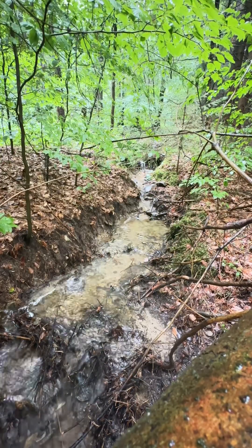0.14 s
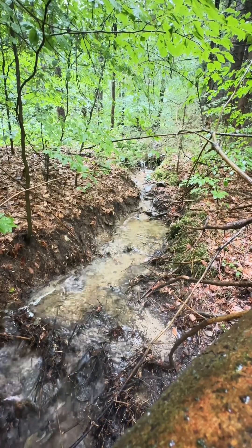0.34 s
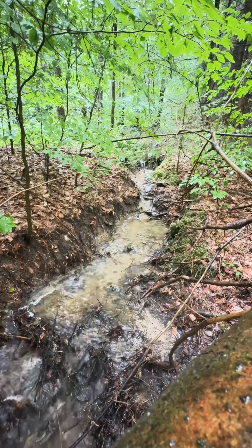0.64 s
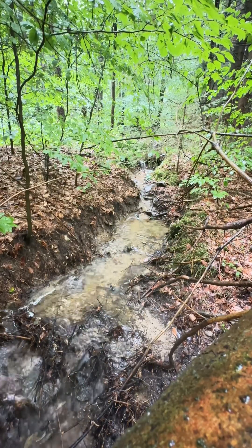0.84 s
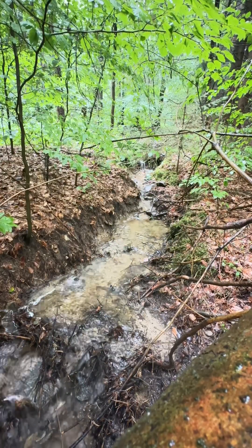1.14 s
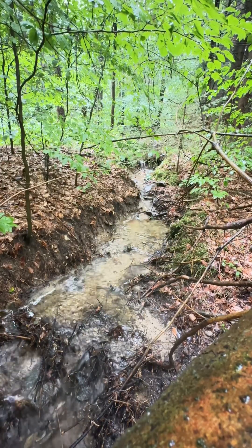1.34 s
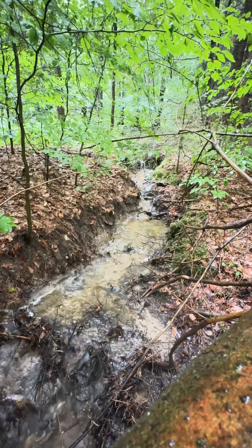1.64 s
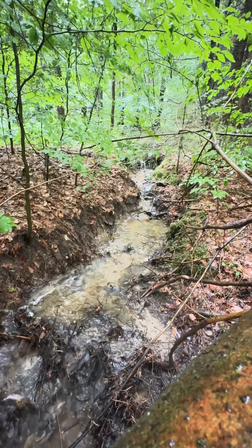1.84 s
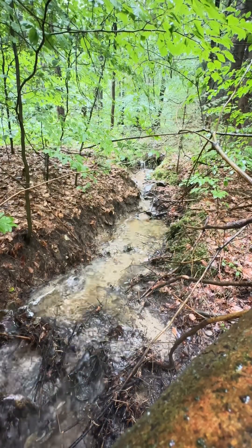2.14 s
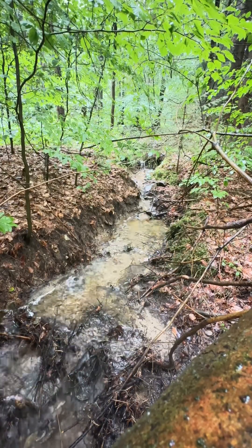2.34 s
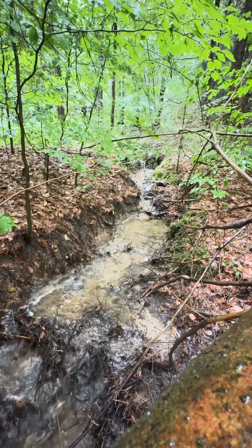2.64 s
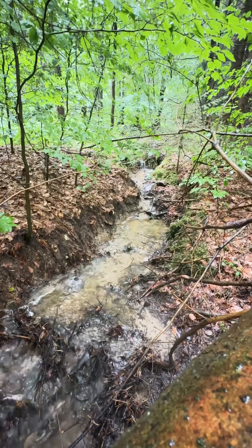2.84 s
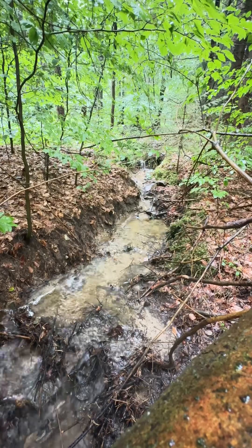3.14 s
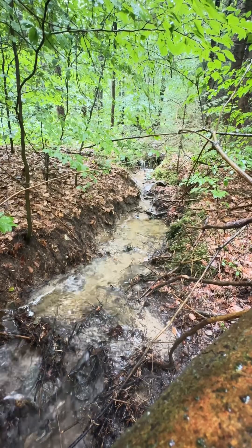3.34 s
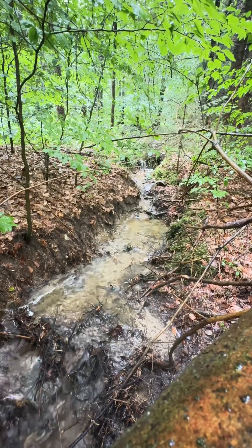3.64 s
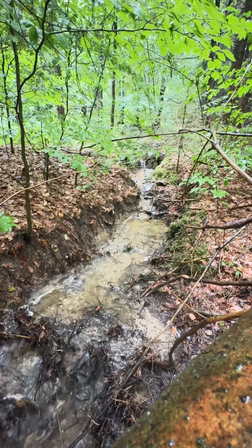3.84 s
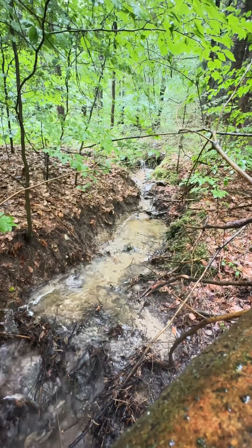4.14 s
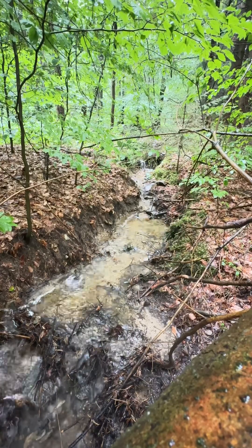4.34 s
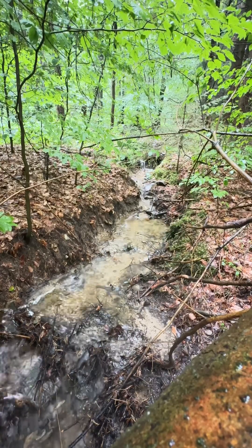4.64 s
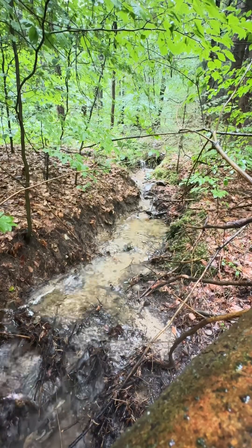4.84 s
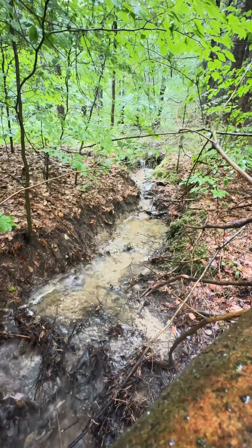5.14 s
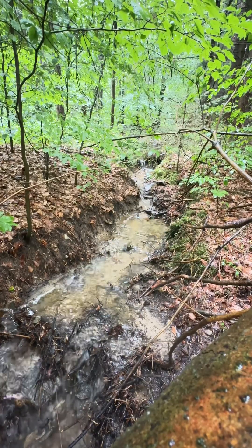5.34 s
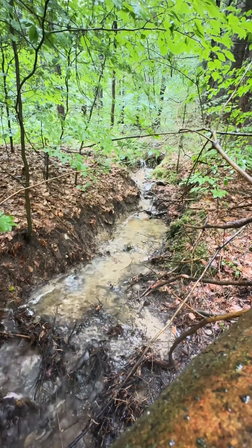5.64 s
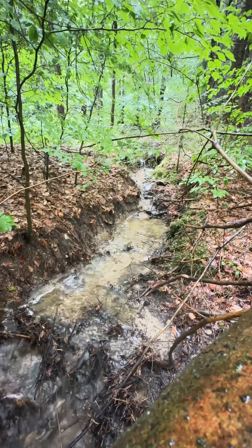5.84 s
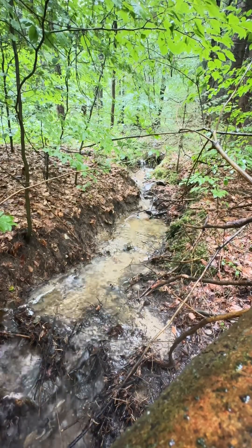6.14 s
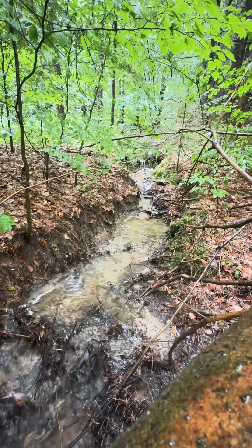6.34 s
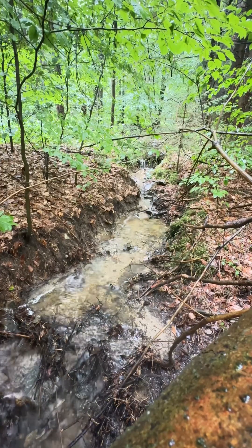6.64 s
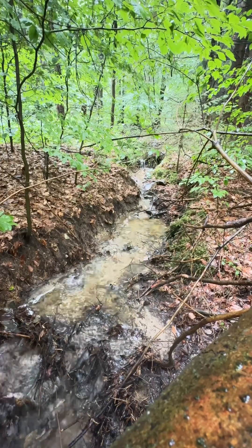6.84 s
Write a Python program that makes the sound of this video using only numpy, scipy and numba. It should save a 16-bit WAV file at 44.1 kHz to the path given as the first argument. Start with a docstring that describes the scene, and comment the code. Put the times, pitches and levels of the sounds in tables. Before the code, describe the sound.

Shallow muddy water burbles and splashes steadily down a gully, interrupted late by one hard dry click and, a second later, a short rasping scrape.

```python
"""A woodland gully, with a small stream tumbling down it a metre or two from a hand-held phone.
Upstream water is wavering noise; trapped air gurgles and drops plip as damped, rising bubble tones.
Showers of short high rings crackle as spray, and a trickle patters on stones in bubbles of like size.
Late on, a sharp click rings and jolts the phone; a short gritty scuff of rough noise and rings follows."""
import sys
import numpy as np
from scipy import signal
from scipy.fft import rfft, irfft, next_fast_len
from scipy.io import wavfile
from scipy.ndimage import uniform_filter1d
from numba import njit

SR = 44100
rng = np.random.default_rng(int(sys.argv[2]) if len(sys.argv) > 2 else 0)


def to_wav(s):
    """Save 16-bit WAV."""
    ch = np.atleast_2d(s).T  # columns
    pcm = np.round(np.clip(ch, -1, 1) * 32767)  # PCM
    wavfile.write(sys.argv[1], SR, pcm.astype(np.int16))


N = 307807
TIME = np.arange(N) / SR  # seconds
SIZE = next_fast_len(N + 8192, True)  # padded, so that filtering does not wrap round
LOG_HZ = np.log(np.maximum(np.arange(SIZE // 2 + 1) * SR / SIZE, 1))


def undb(db):
    """Decibels to gain."""
    return 10 ** (np.asarray(db) / 20)


def unit(x):
    """Scale to rms 1."""
    return x / np.sqrt(np.mean(x ** 2))


def bell(count, limit):
    """Bell-shaped chance, held within a limit either way."""
    return np.clip(rng.standard_normal(count), -limit, limit)


def curve(rows):
    """Rows of (seconds, value), joined by straight lines in time."""
    return np.interp(TIME, *np.transpose(rows))


def over_pitch(rows, axis=1):
    """One column of a table, joined by straight lines in log frequency."""
    rows = np.array(rows)
    return np.interp(LOG_HZ, np.log(rows[:, 0]), rows[:, axis])


def colour(x, points):
    """Shape a sound by gains in dB over frequency, then scale it to rms 1."""
    return unit(irfft(rfft(x, SIZE) * undb(over_pitch(points)), SIZE)[:N])


def walk(rate):
    """Smooth, bounded chance with a spread near 1, heading for a new value `rate` times a second."""
    return 1.2 * np.interp(TIME * rate, np.arange(4096), bell(4096, 1.6))


@njit
def rings(times, size, hz, cycles, glide):
    """Damped sines that swell quickly, die within their cycles and rise in pitch as a surfacing bubble does."""
    out = np.zeros(N)
    for k in range(len(times)):
        start = int(times[k] * SR)
        length = cycles[k] * SR / hz[k]
        for i in range(min(int(length), N - start)):
            age = i / length
            swell = 9 * age * np.exp(1 - 9 * age)
            phase = 2 * np.pi * cycles[k] * age * (1 + glide * (age / 2 - .2))
            out[start + i] += size[k] * swell * np.sin(phase)
    return out


def play(rows, glide=0.):
    """Ring every row of (seconds, peak dB, Hz, cycles)."""
    start_s, db, hz, cycles = np.array(rows, float).T.copy()
    return rings(start_s, undb(db), hz, cycles, glide)


def bubbles(rows, glide):
    """Bubbles of (seconds, peak dB, Hz, ring seconds) sing as they rise to the surface."""
    return play([(s, db, hz, hz * ring_s) for s, db, hz, ring_s in rows], glide)


def strike(hits, modes):
    """Every hit of (seconds, dB) rings the same modes of (Hz, dB, cycles)."""
    return play([(s, db + mode_db, hz, cycles) for s, db in hits for hz, mode_db, cycles in modes])


# Hiss from further up the gully. Each row: frequency in Hz, relative level in dB.
RUSH_SPECTRUM = [(20, -44), (50, -12), (140, -8), (330, -4), (600, 1), (800, 11.5), (950, -0.5), (2000, 6),
                 (3500, -4.5), (4800, -1), (7000, 3), (10900, -10.5), (11900, -63), (15000, -64)]


def rush(waver_db=1.32):
    """Water further up the gully blurs into a soft, wavering hiss."""
    return colour(rng.standard_normal(N), RUSH_SPECTRUM) * undb(waver_db * walk(25))


CHURN_DB = -75  # before its unevenness
# Low stir of the stream's body. Each row: frequency in Hz, relative level in dB.
CHURN_SPECTRUM = [(25, -30), (60, 0), (100, 0), (260, 0.5), (500, -19)]


def churn(rough_db=4, turns_per_s=22):
    """The body of the water turns over in faint, uneven low thuds."""
    return colour(rng.standard_normal(N), CHURN_SPECTRUM) * undb(CHURN_DB + rough_db * walk(turns_per_s))


# A thin trickle over stones comes and goes. Each row: time in seconds, level in dB.
TRICKLE_LEVEL = [(0, -60.5), (.9, -69), (1.45, -61), (2.2, -63.5), (2.7, -66), (3.6, -64), (4.4, -66.5),
                 (6.98, -64)]


def trickle(count=1100, hz=4250, spread=0.071, cycles=28, scatter_db=2.5):
    """A thin thread of water patters on stones in tiny bubbles of nearly one size."""
    times = rng.random(count) * N / SR
    size, loud = bell((count, 2), 2).T
    patter = rings(times, undb(scatter_db * loud), hz * (1 + spread * size), np.full(count, 1. * cycles), 0.)
    return unit(patter) * undb(curve(TRICKLE_LEVEL))


# Weight given to the fine crackle at each pitch. Each row: frequency in Hz, relative gain in dB.
SPRAY_SHAPE = [(1500, 16), (2800, -10.5), (3300, -1.5), (4200, -4.5), (4850, -8.5), (5500, -1.5),
               (6700, -1), (8200, 0), (9300, -6.5), (10400, -2), (11100, -1.5), (11900, -64), (15500, -10)]


def spray(count=40000, cycles=27.0, scatter_db=0.0, burst_db=2.19):
    """Fine droplets and bursting foam crackle in little showers."""
    when, size, ring = rng.random((count, 3)).T
    hz = 2300 + 14000 * size
    strength = undb(scatter_db * bell(count, 2.7)) * np.sqrt(hz)
    crackle = rings(when * N / SR, strength, hz, cycles * (.5 + ring), 0.)
    return colour(crackle, SPRAY_SHAPE) * undb(burst_db * walk(35))


SPATTER_DB = -47.5  # peak of the faintest droplets, before the low-pass and the banks
SPATTER_TOP_HZ = 11000


def spatter(count=320, cycles=22, scatter_db=3.5, lowest_hz=5200, highest_hz=9500):
    """A few larger droplets are flung onto the stones and stick out of the spray."""
    when, size, loud = rng.random((count, 3)).T
    strength = undb(SPATTER_DB + scatter_db * np.minimum(-np.log(1 - loud), 3))  # few are loud
    hz = lowest_hz + size * (highest_hz - lowest_hz)
    flung = rings(when * N / SR, strength, hz, np.full(count, 1. * cycles), 0.)
    low_pass = signal.butter(8, SPATTER_TOP_HZ, fs=SR, output="sos")
    return signal.sosfilt(low_pass, flung)


def banks(x, echo_db=-11, decay_s=0.0081):
    """The wet banks and stones throw back a short cluster of echoes."""
    echo = rng.standard_normal(2048) * np.exp(-TIME[:2048] / decay_s)
    return x + undb(echo_db) * signal.fftconvolve(x, echo / np.linalg.norm(echo))[:N]


# Weight given to the small drops at each pitch. Each row: frequency in Hz, relative gain in dB.
PLIP_SHAPE = [(850, -82), (1080, -4), (1400, -7), (1660, -0.5), (1800, -1.5), (1950, 1.5), (2220, 4),
              (2450, -2.5), (2900, -2), (4000, -76)]


def plips(count=6500, cycles=26, scatter_db=0.9, glide=0.13):
    """Falling drops each trap a tiny, short-lived bubble."""
    when, size, ring = rng.random((count, 3)).T
    strength = undb(scatter_db * bell(count, 2.2))
    drops = rings(when * N / SR, strength, 950 + 2200 * size, cycles * (.5 + ring), glide)
    return colour(drops, PLIP_SHAPE)


SMALLEST_BUBBLE_HZ = 880.6
# Depth of the plunge into the pool. Each row: time in seconds, pitch of its largest bubbles in Hz.
PLUNGE_PITCH = [(0, 440), (.6, 620), (1.4, 470), (3.1, 546), (3.8, 495), (4.0, 360), (4.6, 370), (4.8, 222),
                (6.22, 217), (6.36, 313), (6.98, 388)]
# Weight given to the pool's bubbles at each pitch. Each row: frequency in Hz, relative gain in dB.
GURGLE_SHAPE = [(120, -30), (225, 0), (340, -7), (450, -0.5), (650, -2), (790, 1.5), (850, -10.5),
                (930, -4.5), (1300, -37)]


def gurgles(count=760, order=3, ring_s=0.037, scatter_db=1.5, glide=0.073, breakup_s=0.04, small_bias=1.042):
    """Gulps of air fold in at uneven moments; each breaks into overlapping bubbles, more small than large."""
    chance = rng.random((count, 1 + 3 * order))
    gulp_s = chance[:, 0] * N / SR
    delay, size, ring = chance[:, 1:].reshape(-1, 3).T
    times = np.abs(np.repeat(gulp_s, order) + breakup_s * delay)
    lowest_hz = np.interp(times, *np.transpose(PLUNGE_PITCH))
    hz = SMALLEST_BUBBLE_HZ - size ** small_bias * (SMALLEST_BUBBLE_HZ - lowest_hz)
    gulp_strength = undb(scatter_db * bell(count, 1.8))
    strength = np.repeat(gulp_strength, order) * np.sqrt(hz)
    return colour(rings(times, strength, hz, hz * ring_s * (.5 + ring), glide), GURGLE_SHAPE)


# layer levels in dB, before the surges, wavering and depth of the plunge
GURGLE_DB, PLIP_DB, SPRAY_DB, RUSH_DB = -54, -53.5, -50.5, -52
# the pool grows louder for each octave that its largest bubbles reach below the usual pitch
USUAL_BUBBLE_HZ, DEPTH_DB_PER_OCTAVE = 500, 3


def water(pool_surge_db=-0.74, drop_surge_db=1.5, foam_surge_db=0.5, surges_per_s=14):
    """One stretch of stream: pool, drops and spray surge by chance; the pool also follows the plunge's depth."""
    depth = np.log2(USUAL_BUBBLE_HZ / curve(PLUNGE_PITCH))  # octaves
    pool_db = GURGLE_DB + DEPTH_DB_PER_OCTAVE * depth + pool_surge_db * walk(surges_per_s)
    pool = gurgles() * undb(pool_db)
    drops = plips() * undb(PLIP_DB + drop_surge_db * walk(surges_per_s))
    foam = spray() * undb(SPRAY_DB + foam_surge_db * walk(surges_per_s))
    return pool + drops + churn() + banks(foam + undb(RUSH_DB) * rush())


GLUG_LOW_CUT_HZ = 365  # the single bubbles carry little sound below this
GLUG_GLIDE, DROP_GLIDE = 0.07, 0.1  # each bubble rises by this share of its pitch
TICK_CYCLES = 35
# Single large bubbles in the pool.
# Each row: start in seconds, peak in dB before the low cut, pitch in Hz, ring in seconds.
POOL_GLUGS = [(0.003, -42.5, 720, 0.058), (0.04, -49, 560, 0.073), (0.109, -42, 500, 0.017),
              (0.181, -42.3, 705.0, 0.026), (0.267, -44.5, 670, 0.065), (0.585, -45.5, 771, 0.082),
              (0.64, -42, 680, 0.035), (1.164, -43.5, 744, 0.036), (1.323, -47, 570.0, 0.05),
              (1.371, -45, 797, 0.057), (1.403, -44, 535, 0.031), (1.465, -44, 800, 0.081),
              (1.647, -39, 740, 0.035), (1.648, -46.1, 634, 0.084), (1.765, -45.5, 780.0, 0.06),
              (1.821, -40, 574, 0.025), (2.025, -37, 780.0, 0.052), (2.079, -45, 585.0, 0.075),
              (2.125, -41.5, 760, 0.045), (2.235, -39, 730, 0.047), (2.244, -41.9, 580, 0.04),
              (2.254, -43, 790, 0.037), (2.507, -46, 788, 0.065), (2.556, -43.5, 660.0, 0.033),
              (2.639, -48, 760, 0.051), (2.841, -41, 600.0, 0.023), (2.881, -40.6, 790, 0.048),
              (2.952, -40, 780.0, 0.065), (3.142, -43.7, 783, 0.059), (3.142, -36, 582, 0.028),
              (3.286, -46, 735.0, 0.068), (3.348, -42.5, 550, 0.018), (3.414, -43, 749, 0.07),
              (3.478, -39.5, 750, 0.038), (3.479, -45.7, 668, 0.087), (3.589, -43.5, 700, 0.077),
              (3.749, -39.5, 705.0, 0.026), (3.86, -46.1, 507, 0.045), (3.955, -37.5, 510.0, 0.02),
              (3.994, -45, 762, 0.07), (4.06, -43, 735.0, 0.045), (4.096, -35.1, 780.0, 0.038),
              (4.15, -43, 750.0, 0.065), (4.178, -36.5, 782, 0.035), (4.211, -41.5, 800, 0.06),
              (4.257, -38.5, 493, 0.028), (4.311, -38, 660.0, 0.016), (4.328, -41.5, 760, 0.041),
              (4.378, -37, 770, 0.016), (4.384, -35.4, 785, 0.042), (4.465, -42.2, 750, 0.037),
              (4.497, -36.5, 560, 0.026), (4.555, -37.5, 750, 0.018), (4.569, -41, 735.0, 0.045),
              (4.617, -37.5, 765.0, 0.045), (4.676, -40, 525.0, 0.03), (4.699, -41.5, 755, 0.039),
              (4.962, -39, 760, 0.023), (5.094, -41.4, 765.0, 0.033), (5.26, -38.8, 585.0, 0.014),
              (5.344, -41, 467, 0.061), (5.527, -33.9, 620, 0.018), (5.692, -47, 750.0, 0.027),
              (5.956, -40, 765.0, 0.035), (6.194, -40.8, 740, 0.028), (6.22, -37.5, 733, 0.037),
              (6.305, -35.7, 555.0, 0.016), (6.312, -39.9, 726, 0.028), (6.48, -37, 740, 0.015),
              (6.551, -38, 690, 0.018), (6.612, -45, 784, 0.073), (6.781, -42, 785, 0.025)]
# Heavy drops plip on the pool. Each row: start in seconds, peak in dB, pitch in Hz, ring in seconds.
HEAVY_DROPS = [(0.3234, -38.7, 2220.0, 0.0091), (0.3907, -36, 2200, 0.012), (0.5011, -43, 2020.0, 0.017),
               (0.5925, -37, 2110, 0.008), (0.6064, -37, 2200, 0.02), (0.7862, -37, 2020.0, 0.008),
               (0.8324, -42.7, 1940.0, 0.02), (0.9515, -32.5, 2120, 0.0091), (1.0889, -30.5, 2120, 0.008),
               (1.3231, -39.6, 2060.0, 0.018), (1.3394, -34.5, 2060.0, 0.012), (1.3805, -34.3, 1880, 0.008),
               (1.5415, -41.6, 2180.0, 0.02), (1.6193, -42.6, 2260.0, 0.02), (1.8031, -43.1, 1900.0, 0.02),
               (2.0249, -35, 2260.0, 0.0099), (2.2946, -34, 2060.0, 0.008), (2.5109, -42.9, 2250, 0.02),
               (2.5156, -36, 1820.0, 0.008), (2.5469, -40.6, 2140.0, 0.013),
               (2.5738, -35.2, 2100.0, 0.0046), (2.5816, -41.5, 2060.0, 0.02), (2.6378, -42, 2260.0, 0.02),
               (2.6453, -42.0, 2180.0, 0.02), (2.7932, -36.1, 1780.0, 0.008),
               (2.9598, -35.5, 2180.0, 0.0094), (3.1061, -38, 2220.0, 0.013),
               (3.1652, -32.5, 2180.0, 0.0056), (3.217, -35, 2100.0, 0.0088), (3.5385, -35, 2020.0, 0.005),
               (3.5813, -42.5, 2020.0, 0.027), (3.843, -41.2, 2070, 0.013), (4.0782, -32, 1940.0, 0.005),
               (4.1444, -37, 2100.0, 0.013), (4.1615, -40, 2200, 0.02), (4.4934, -39.8, 2120, 0.013),
               (4.8353, -37, 2440, 0.0074), (5.0232, -41, 1900.0, 0.023), (5.5371, -41.3, 2200, 0.024),
               (5.9149, -32, 2060.0, 0.008), (6.0312, -43, 2260.0, 0.02), (6.0825, -42.7, 2220.0, 0.02),
               (6.2548, -40, 2270, 0.021), (6.5143, -36, 2000, 0.011), (6.8752, -40.5, 1780.0, 0.02),
               (6.9006, -34.9, 1850, 0.008)]
# Droplets burst close by with a tick. Each row: start in seconds, peak in dB, pitch in Hz.
DROPLET_TICKS = [(.108, -32, 8490), (0.364, -43, 7600), (0.952, -34, 8200), (1.3284, -38, 3420),
                 (1.911, -43, 4180), (2.125, -43, 4090), (2.172, -42, 3700), (2.3, -38, 6400),
                 (2.5167, -43, 4250), (2.8075, -42, 4470), (3.181, -33.5, 8400), (3.441, -36.5, 9000),
                 (3.5423, -42, 4070), (3.901, -34.5, 6900), (4.2023, -37, 7080), (4.359, -32.5, 6910),
                 (4.735, -42, 3730), (4.798, -32, 8100), (4.8495, -29, 8260), (5.392, -31, 8600),
                 (6.0, -34, 7120), (6.227, -39, 6470), (6.326, -35, 7920), (6.671, -32.5, 7500),
                 (6.8315, -32.5, 6500)]


def splashes():
    """Bubbles, drops and ticks that stand out of the stream, with the trickle and the spatter on the stones."""
    low_cut = signal.butter(4, GLUG_LOW_CUT_HZ, "high", fs=SR, output="sos")
    glugs = signal.sosfilt(low_cut, bubbles(POOL_GLUGS, GLUG_GLIDE))
    drops = bubbles(HEAVY_DROPS, DROP_GLIDE)
    ticks = play([(s, db, hz, TICK_CYCLES) for s, db, hz in DROPLET_TICKS])
    return glugs + drops + ticks + trickle() + banks(spatter())


def grit(rough_db=2.5, chatter_db=3.5):
    """Noise whose level jumps from grain to grain and chatters as the contact catches."""
    grains = np.repeat(bell(N // 64 + 1, 2), 64)[:N]  # each grain lasts 64 samples
    return rng.standard_normal(N) * undb(rough_db * grains + chatter_db * walk(400))


# the scuff bears down harder and harder, then lets go; SCUFF_DB is the level at its peak
SCUFF_START_S, SCUFF_PEAK_S, SCUFF_DB = 5.823, 5.866, -33.5
SCUFF_RISE_DB_PER_S, SCUFF_FALL_DB_PER_S = 274, 620
# the drag climbs towards DRAG_DB and fades out over the release, just before the peak
DRAG_DB, DRAG_RISE_DB_PER_S, DRAG_RELEASE_S = -36.5, 300, .004
SLIP_PIVOT_HZ = 2780  # the tilt leaves the level at this pitch as it is
# Grit close to the phone. Each row: frequency in Hz, relative gain in dB.
SCUFF_SHAPE = [(60, -34), (170, -16), (600, 4.5), (800, 0), (1020, -29), (1450, 2.5), (2300, -13),
               (3100, 4), (4000, -7), (5600, -3.5), (8500, -5), (11000, -22), (12000, -50)]
# The rasping drag. Each row: frequency in Hz, relative gain in dB.
DRAG_SHAPE = [(200, -19), (700, 0), (1020, -19), (1400, 8), (1650, 7), (2200, -14), (3100, 4), (4300, -22),
              (5000, -3), (5500, 7), (6100, -11), (9000, -17), (12000, -45)]
# The contact catches and slips on the way, duller as it lets go.
# Each row: start in seconds, level in dB, tilt in dB per octave, pitch as a share of the modes' own.
CATCHES = [(5.8242, -37, -4, 0.96), (5.8272, -44, -7, 1.1), (5.835, -33.5, -7.5, 1), (5.841, -37, 1, 1.2),
           (5.8535, -35, 6, .98), (5.862, -27, 6, 1.03), (5.8649, -25, 2, 0.89), (5.8666, -22, 4, .97),
           (5.8697, -25, -3, 1.05), (5.875, -30, -8, 1.1)]
# What each slip rings. Each row: pitch in Hz, level in dB relative to the slip, ring in cycles.
SCUFF_MODES = [(644, -17.5, 7.5), (1450, -12.5, 19), (1830, -10, 23), (2750, -6, 17), (3170, 1, 19),
               (3930, -10.5, 29), (4860, -9.5, 38), (5500, -12, 45)]


def scuff():
    """Something rubs close by: a rasping drag gives way in a swell of grit, and each slip rings the modes."""
    past_peak, touching = TIME - SCUFF_PEAK_S, TIME > SCUFF_START_S
    rise_or_fall_db = np.minimum(SCUFF_RISE_DB_PER_S * past_peak, -SCUFF_FALL_DB_PER_S * past_peak)
    swell = undb(SCUFF_DB + rise_or_fall_db)
    release = np.clip(-past_peak / DRAG_RELEASE_S, 0, 1)
    drag = undb(DRAG_DB + DRAG_RISE_DB_PER_S * np.minimum(past_peak, 0)) * release
    slips = play([(s, db + mode_db + tilt * np.log2(hz / SLIP_PIVOT_HZ), hz * pitch, cycles)
                  for s, db, tilt, pitch in CATCHES for hz, mode_db, cycles in SCUFF_MODES])
    return touching * (swell * colour(grit(), SCUFF_SHAPE) + drag * colour(grit(), DRAG_SHAPE)) + slips


KNOCK_S = 4.9435  # the jolted phone thumps softly in the hand just after the click
# the grip rumbles from the knock on, fading slowly until the hand is still
GRIP_DB, GRIP_FADE_DB_PER_S, GRIP_END_S = -69.5, 6.5, 6.35
# A light touch, then the click. Each row: start in seconds, level in dB.
TOUCH_AND_CLICK = [(4.9247, -20), (4.9332, -7)]
# What the touch and click ring. Each row: pitch in Hz, level in dB relative to the hit, ring in cycles.
SNAP_MODES = [(13600, -3, 5.1), (9100, 2, 9.2), (7640, -9, 14), (5300, -15.5, 25), (1840, -23.5, 10),
              (815, -27, 15), (209, -35.5, 4.4)]
# What the knock in the hand rings. Each row: pitch in Hz, level in dB, ring in cycles.
HAND_MODES = [(57.6, -38.5, 4.1), (86, -37, 2.6), (135, -39, 2.1), (270, -36, 3.7), (780, -40, 7)]
# Rumble of the grip. Each row: frequency in Hz, relative level in dB.
GRIP_SPECTRUM = [(20, -21), (50, -9), (85, 0.5), (140, -6), (250, -3), (600, -53)]


def click():
    """A hard, dry snap at the phone, its dull knock in the hand, and the rumble of the settling grip."""
    age = np.maximum(TIME - KNOCK_S, 0)
    gripping = (age > 0) & (TIME < GRIP_END_S)
    settling = undb(GRIP_DB - GRIP_FADE_DB_PER_S * age) * gripping
    rumble = colour(rng.standard_normal(N), GRIP_SPECTRUM) * uniform_filter1d(settling, size=1024)
    snap = strike(TOUCH_AND_CLICK, SNAP_MODES)
    knock = strike([(KNOCK_S, 0)], HAND_MODES)
    return snap + knock + rumble


def close_by(x, left_db=-1):
    """A sound at the phone's right edge reaches the left port one sample later and a little weaker."""
    return np.array([undb(left_db) * np.roll(x, 1), x])


# How the two channels share the sound. Each row: frequency in Hz, likeness of sound from all around # from 0 to
# 1, lead of the right channel in radians. Near 11 kHz the two channels turn almost opposite.
STEREO_SPREAD = [(60, .85, 0), (140, .55, 0), (750, .97, 0), (950, .5, .5), (1100, .8, -1), (1600, .96, 0),
                 (2250, .96, 0), (2800, .65, -.4), (3250, .55, 2), (3800, .2, 1.5), (4300, .45, .1),
                 (4900, .2, 0), (5500, .5, 1.1), (6300, .75, .45), (7500, .78, .75), (8400, .75, 1.5),
                 (9300, .68, 1.1), (10300, .75, 1.9), (11200, .97, 3.1)]


def stereo(ahead, around=None):
    """Sound from ahead reaches the two channels slightly out of step, and sound from around them unalike."""
    mid, side = rfft(ahead, SIZE), 0
    if around is not None:
        unlike = (1 - np.clip(over_pitch(STEREO_SPREAD), 0, 1)) / 2  # share of the power
        mid, side = np.sqrt(1 - unlike) * mid, np.sqrt(unlike) * rfft(around, SIZE)
    turn = np.exp(.5j * over_pitch(STEREO_SPREAD, axis=2))  # half the lead for each channel
    return irfft(np.array([(mid + side) / turn, (mid - side) * turn]), SIZE)[:, :N]


def scene():
    """Water ahead and all around, single splashes and the scuff in front, and the click at the phone itself."""
    stream = stereo(water(), water())
    in_front = stereo(splashes() + scuff())
    return stream + in_front + close_by(click())


TOP_HZ = 15900


def record(dry):
    """The phone cuts the top with a steep low-pass."""
    return signal.sosfilt(signal.ellip(8, .2, 70, TOP_HZ, fs=SR, output="sos"), dry)


dry = scene()
out = record(dry)
to_wav(out)
```